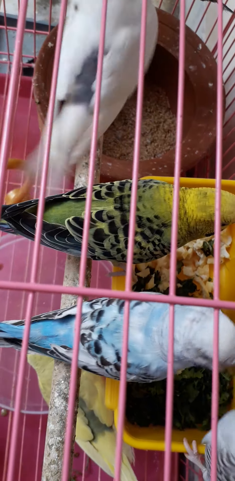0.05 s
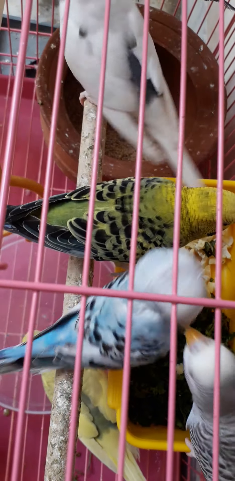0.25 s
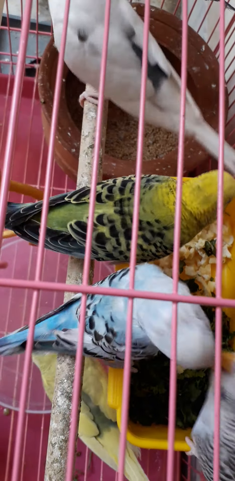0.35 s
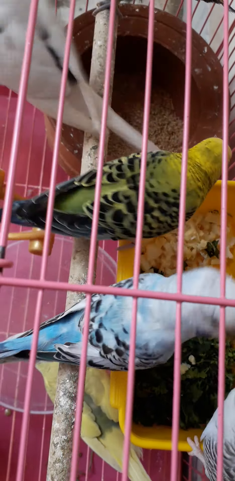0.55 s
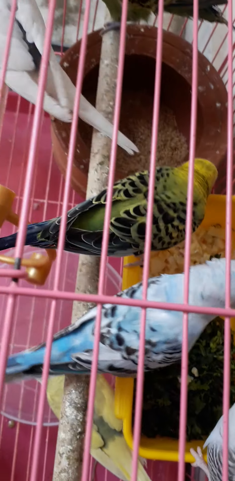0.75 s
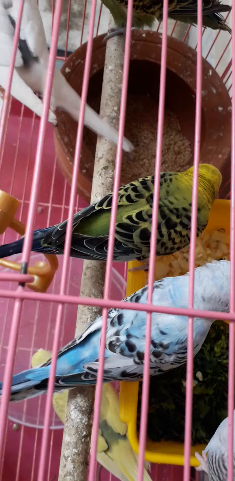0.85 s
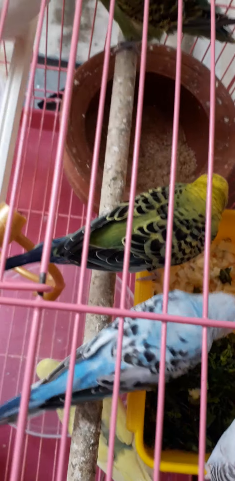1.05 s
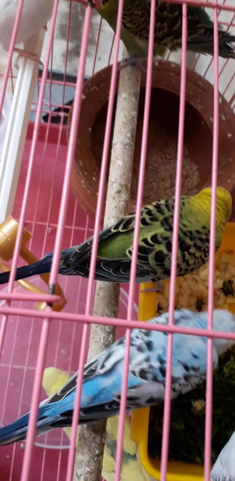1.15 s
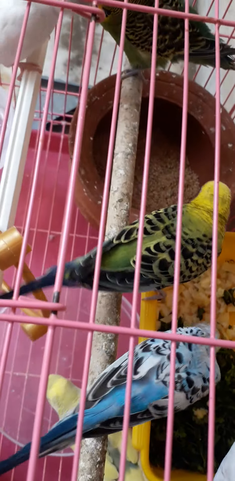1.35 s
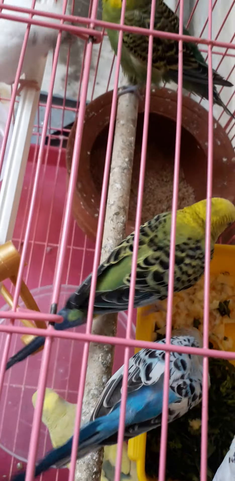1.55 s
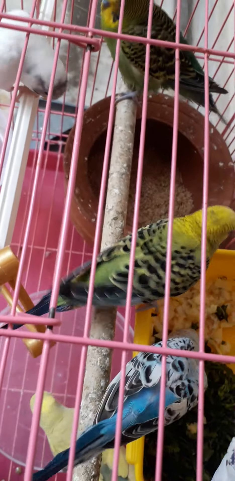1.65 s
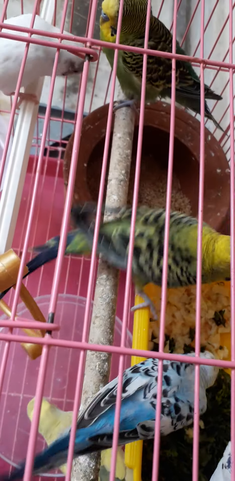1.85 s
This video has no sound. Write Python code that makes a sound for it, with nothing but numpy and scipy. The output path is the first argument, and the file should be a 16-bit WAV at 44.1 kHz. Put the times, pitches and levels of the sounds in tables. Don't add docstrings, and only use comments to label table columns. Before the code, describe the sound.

Caged budgies give a quick run of raspy squawks and arched chirps, then a quieter gap of ticks and rustles, tiny peeps and one final sharp chirp; close phone microphone, small echoing room, low motor hum.

```python
import sys
import numpy as np
from scipy import signal
from scipy.fft import rfft, irfft, next_fast_len
from scipy.io import wavfile
from scipy.ndimage import uniform_filter1d, map_coordinates

SR = 44100
rng = np.random.default_rng(int(sys.argv[2]) if len(sys.argv) > 2 else 0)


def undo_db(level):
    steps = np.asarray(level, float) / 20
    return 10 ** steps


def output_pcm(signal):
    pcm = np.clip(np.atleast_2d(signal).T, -1, 1) * 32767
    wavfile.write(sys.argv[1], SR, np.round(pcm).astype(np.int16))


N = 83790
LEAD = SR // 10

# start_s, pitch_hz, fundamental_db, octave_db
SQUAWKS = [
    [(.2315, 1270, -45, -31), (.238, 1857, -36.5, -37), (.245, 2026, -33, -23.5), (.255, 1953, -31, -27),
     (.261, 2079, -33.5, -14), (.274, 2012, -32, -24.5), (.278, 2058, -32, -18), (.289, 1995, -31, -21),
     (.297, 1290, -53, -38.5)],
    [(.335, 1157, -32, -34), (.339, 1410, -41, -23.5), (.344, 1900, -39, -28), (.350, 2116, -41, -23),
     (.363, 2054, -36, -23.5), (.367, 2094, -39, -35), (.375, 2166, -29.5, -52), (.381, 1774, -39.5, -45),
     (.387, 1540, -44, -40)],
    [(.432, 1285, -40, -39), (.436, 1950, -40.5, -38.5), (.440, 2205, -39, -53), (.456, 2336, -32.5, -53),
     (.460, 1970, -38, -46), (.465, 1414, -54, -50)],
]
# start_s, pitch_hz, fundamental_db, octave_db
CHIRPS = [
    [(0.040, 1243, -41, -32), (0.044, 1614, -39, -30.5), (0.05, 2150, -33, -36), (0.056, 2185, -32, -38.5),
     (0.064, 1927, -31.5, -35.5), (0.070, 1440, -54, -43)],
    [(0.506, 1120, -40, -34), (0.509, 1440, -40, -33), (0.516, 2110, -38, -38.5), (.523, 2250, -37, -41.5),
     (.531, 1970, -32.5, -31.5), (0.538, 1850, -34, -41), (0.548, 1460, -55, -43)],
    [(0.595, 1300, -43, -29.5), (.598, 1553, -43, -32), (0.604, 1844, -36.5, -41.5),
     (0.615, 2000, -35, -38), (.621, 1960, -40, -39), (.626, 1580, -45, -37), (0.632, 1390, -51, -41.5)],
]
# start_s, pitch_hz, fundamental_db, octave_db
LATE_CHIRPS = [
    [(0.696, 1474, -39.5, -42), (.699, 1693, -50, -35.5), (0.704, 2067, -43, -45), (0.716, 2248, -40, -44),
     (.727, 2018, -43.5, -43), (0.735, 1640, -53, -44.5)],
    [(0.841, 1310, -44, -44), (.845, 1604, -46, -31.5), (0.85, 2044, -33, -31), (0.857, 2070, -33.5, -30.5),
     (.860, 1984, -36, -31.5), (0.8635, 1530, -49, -35.5)],
    [(1.771, 1715, -39, -37), (1.774, 1777, -39.5, -33.5), (1.779, 2200, -40, -41),
     (1.787, 2330, -29.5, -42.5), (1.795, 2245, -41, -47), (1.803, 2276, -41, -45), (1.811, 1760, -47, -46)],
]
CALL_ROUGH = [.13, .16, .26, .28, .33, .28, .2, .26, .3]
CALL_BRIGHT_DB = [0.55, -1.5, -1.3, -1.8, -0.37, 1.2, 8.1, 1.9, 2.1]
CALL_BREATH_DB = [-45.5, -56.5, -65, -57, -56, -54.5, -67, -55, -68]
# start_s, length_s, top_pitch_hz, level_db, octave_over_fundamental_db
PEEPS = [(-.034, 0.036, 2438, -31.5, -17), (-.03, .032, 2210, -32.5, -16), (-.02, 0.017, 1990, -40, -6),
         (0.147, 0.012, 1777, -42, 4), (0.19, 0.0085, 2630, -44, -12), (1.337, 0.011, 1880, -47.5, -1.5),
         (1.477, 0.0071, 2080, -44.5, -13), (1.585, .014, 1556, -48.5, -1.5),
         (1.612, 0.014, 1300, -43, -15), (1.628, 0.0072, 2030, -44, -10), (1.683, 0.013, 1676, -49, 4),
         (.829, 0.0035, 3320, -55, -20)]
# start_s, length_s, top_pitch_hz, level_db, octave_over_fundamental_db
FLAT_PEEPS = [
    (1.424, 0.021, 1755, -60.5, 11.5),
    (1.784, 0.02, 2620, -32, -20),
    (1.837, 0.0073, 2520, -40, -20),
]
OVERTONES_DB = [-20.5, -22.5, -27, -32, -34]
# freq_hz, level_db
RASP = [(900, -25), (1500, -10.5), (2800, -2.5), (4300, 6), (5200, -9.5), (9000, -14.5), (15000, -35)]
# freq_hz, level_db
BEAK = [(5000, -30), (7000, -3), (10000, 0), (12800, -3), (13800, -12), (16000, -22)]
# start_s, peak_db, t60_s, bright_over_dull_db
TICKS = [(0.192, -43, 0.097, 6), (.424, -49, .02, 0), (0.464, -37, 0.043, 5), (0.5677, -33, 0.04, -7),
         (0.637, -48, 0.026, -3), (.652, -39, 0.022, -3), (0.668, -38, 0.027, -4), (1.05, -39, 0.0091, 2),
         (1.0632, -33, 0.068, 2), (1.0738, -47, 0.027, 0), (1.1167, -38.5, 0.016, -3),
         (1.1615, -52, 0.03, -2), (1.3354, -64, 0.02, -11), (1.403, -46, 0.077, -9),
         (1.4486, -52, 0.025, 0), (1.516, -51, 0.032, -10), (1.541, -49, 0.021, -8), (1.604, -58, 0.03, -8),
         (1.6606, -40, 0.022, 0), (1.6906, -48, 0.039, 2), (1.7522, -43, 0.018, -6), (1.855, -45, 0.03, 6),
         (1.882, -46, 0.05, 3.5), (1.889, -45, .04, 6)]
# time_s, level_db
RUSTLE = [(0, -57), (.13, -58), (.3, -58), (.58, -62), (.7, -60), (.8, -69), (.9, -55), (1.0, -72),
          (1.1, -60.5), (1.25, -72), (1.37, -72), (1.45, -55), (1.58, -77), (1.7, -62), (1.74, -70),
          (1.9, -68)]
# freq_hz, level_db
HUSK = [(2500, -24), (5500, -6), (7000, -4), (10000, 0), (13000, -6.5), (16000, -15)]
# freq_hz, level_db
DULL = [(9500, 0), (11500, -30)]
# freq_hz, level_db
BRIGHT = [(9500, -30), (11500, 0)]
# freq_hz, t60_s
ROOM = [(500, 0.53), (2100, 0.24), (4000, 0.15), (8000, 0.14), (15000, 0.056)]
# freq_hz, level_db
WALLS = [(500, -3.5), (2200, 1.5), (4000, -2.5), (8000, 2.5), (15000, 0)]
# freq_hz, level_db_per_hz
AIR = [(20, -40), (60, -19.5), (150, -6), (400, -14.5), (600, -16.5), (3500, -22), (5600, -34.5),
       (15000, -88)]
# time_s, level_db
AIR_LEVEL = [(0.0, -57.5), (0.464, -58), (1.9, -55)]
# freq_hz, width_hz, level_db
HUM = [(63.5, 12, -68), (121, 36, -58.5), (164.3, 13, -54), (246.5, 17, -58.5), (297.3, 10.77, -62.5),
       (358.8, 28, -65.5)]
# time_s, level_db
LOAD = [(0, 0), (.9, 2.5), (1.15, -1.5), (1.35, 4.5), (1.6, 4), (1.66, 1), (1.75, 3.5)]

QUIVER, ROUGH_GROWS = 0.006, 0.8
GLIDE_LOSS_DB, LOW_DRIVE_DB = 40, -6
FLUTTER_DB, PATCHY_DB, RASP_DB = 6, 0.7, -20
ATTACK_S, RELEASE_S, DIRECT_DB = 0.0015, 0.002, 3
PEEP_DIP, FLAT_DIP, PEEP_RISE_S = 0.235, 0.05, 0.00353
PEEP_SWELL_DB, PEEP_ROUGH, PEEP_BRIGHT_DB, PEEP_BREATH_DB = 3, 0.28, 3, -81
CRACK_S, SWELL_DB, GRAIN_DB = 0.004, 3, 2.5
WET_DB, EARLY_DB, EARLY_S = -9.5, -20.5, 0.03
AIR_OVER_DB = 9


def unit(x):
    return x / np.sqrt(np.mean(x ** 2) + 1e-20)


def along(points, hz):
    f, v = np.transpose(points)
    return np.interp(np.log(hz + 1), np.log(f + 1), v)


def curve(rows):
    return np.interp(np.arange(N) / SR, *np.transpose(rows))


def wobble(rate, size):
    knots = rng.standard_normal(int(size * rate / SR) + 4)
    return map_coordinates(knots, [np.arange(size) * rate / SR])


def coloured(x, points):
    m = next_fast_len(len(x) + 8192)
    gain = undo_db(along(points, np.fft.rfftfreq(m, 1 / SR)))
    return irfft(rfft(x, m) * gain, m)[:len(x)]


def call(pitch, low_db, octave_db, length, rough, bright_db, breath_db):
    size = len(pitch)
    t = np.arange(size) / SR
    quivering = uniform_filter1d(pitch, size=130) * (1 + QUIVER * wobble(400, size))
    phase = 2 * np.pi * np.cumsum(quivering) / SR
    effort = np.sqrt(undo_db(low_db + LOW_DRIVE_DB) ** 2 + undo_db(octave_db) ** 2)
    glide_db = GLIDE_LOSS_DB * (1 - pitch / pitch.max())
    levels = [undo_db(low_db), undo_db(octave_db)]
    levels += [effort * undo_db(over_db + bright_db - glide_db) for over_db in OVERTONES_DB]
    tone = np.zeros(size)
    for k, level in enumerate(levels, 1):
        flutter_db = (FLUTTER_DB * rough + PATCHY_DB * max(k - 2, 0)) * wobble(220, size)
        jitter = rough * k ** ROUGH_GROWS * wobble(595, size)
        tone += level * undo_db(flutter_db) * np.sin(k * phase + jitter) * (k * pitch < SR / 2)
    gated = rng.standard_normal(size) * (1 + np.cos(phase))
    rasp = unit(coloured(gated, RASP)) * effort * undo_db(RASP_DB + 20 * rough)
    hiss = unit(coloured(rng.standard_normal(size), BEAK))
    hiss *= undo_db(breath_db) * np.sqrt(effort / np.max(effort))
    opening = np.clip(t / ATTACK_S, 0, 1)
    closing = np.clip((length - t) / RELEASE_S + 1, 0, 1)
    return np.sqrt(2) * opening * closing * (tone + rasp + hiss)


def squawks_and_chirps():
    out, t = np.zeros(N + LEAD + SR), np.arange(LEAD) / SR
    calls = SQUAWKS + CHIRPS + LATE_CHIRPS
    for rows, *voice in zip(calls, CALL_ROUGH, CALL_BRIGHT_DB, CALL_BREATH_DB):
        s, *columns = np.transpose(rows)
        arches = [np.interp(s[0] + t, s, column) for column in columns]
        sound = call(*arches, s[-1] - s[0], *voice)
        out[LEAD + round(s[0] * SR):][:LEAD] += undo_db(DIRECT_DB) * sound
    return out[:N + LEAD]


def peeps():
    out, t = np.zeros(N + LEAD + SR), np.arange(LEAD) / SR
    yet_to_climb = np.exp(-t / PEEP_RISE_S)
    for rows, dip in [(PEEPS, PEEP_DIP), (FLAT_PEEPS, FLAT_DIP)]:
        for s, length, top_hz, level_db, octave_db in rows:
            pitch = top_hz * (1 - dip * yet_to_climb)
            db = level_db - PEEP_SWELL_DB * yet_to_climb
            sound = call(pitch, db, db + octave_db, length, PEEP_ROUGH, PEEP_BRIGHT_DB, PEEP_BREATH_DB)
            out[LEAD + round(s * SR):][:LEAD] += sound
    return out[:N + LEAD]


def claws_and_husks():
    t, cracks = np.arange(SR // 8) / SR, np.zeros((2, N + SR))
    for s, db, t60, bright_db in TICKS:
        decay = undo_db(-60 * t / max(t60, 0.003)) + 0.36 * undo_db(-60 * t / CRACK_S)
        tilt_db = bright_db * np.array([[-0.5], [0.5]])
        cracks[:, round(s * SR):][:, :len(t)] += undo_db(db - 11.5 + tilt_db) * decay
    swings_db = SWELL_DB * wobble(41.4, N) + GRAIN_DB * wobble(270, N)
    rustle = undo_db(curve(RUSTLE) - 7 + swings_db)
    husk = unit(coloured(rng.standard_normal(N), HUSK))
    halves = np.array([coloured(husk, DULL), coloured(husk, BRIGHT)])
    return np.pad((halves * (cracks[:, :N] + rustle)).sum(axis=0), (LEAD, 0))


def room(x):
    hz, t, z = signal.stft(rng.standard_normal(SR // 2), SR, nperseg=256)
    decay = undo_db(-60 * t / along(ROOM, hz)[:, None])
    tail = signal.istft(z * decay, SR, nperseg=256)[1]
    tail = undo_db(WET_DB) * np.pad(tail / np.linalg.norm(tail), (200, 0))
    walls = rng.uniform(size=(16, 2))
    bounces = (SR * (0.003 + EARLY_S * walls[:, 0])).astype(int)
    tail[bounces] += undo_db(EARLY_DB) * (2 * walls[:, 1] - 1)
    return x + coloured(signal.fftconvolve(x, tail)[:len(x)], WALLS)


def fan_motor():
    t, hum = np.arange(N) / SR, np.zeros(N)
    for hz, width, db in HUM:
        level = np.sqrt(2) * undo_db(db + 2.46 * wobble(width / 2, N))
        drift = 0.285 * np.cumsum(width * wobble(width, N)) / SR
        hum += level * np.sin(2 * np.pi * (hz * t + drift))
    return undo_db(curve(LOAD)) * hum


def room_noise():
    z = signal.stft(rng.standard_normal(N + 512), nperseg=512)[2]
    patches = uniform_filter1d(uniform_filter1d(rng.standard_normal(z.shape), 6, 0), 10, 1)
    noise = signal.istft(z * undo_db(1.22 * unit(patches)), nperseg=512)[1][:N]
    return undo_db(curve(AIR_LEVEL) + AIR_OVER_DB) * unit(coloured(noise, AIR))


def scene():
    cage = squawks_and_chirps() + peeps() + claws_and_husks()
    return (room(cage)[LEAD:] + fan_motor() + room_noise())[None]


def top_cut(x):
    return signal.sosfilt(signal.butter(12, 15980, fs=SR, output="sos"), x)


def record(dry):
    heard = np.fft.rfftfreq(N, 1 / SR) < 15800
    mix = irfft(rfft(dry) * heard, N)
    return top_cut(mix)


dry = scene()
out = record(dry)
output_pcm(out)
```